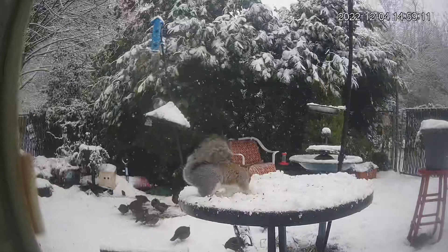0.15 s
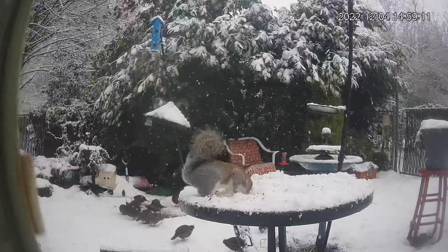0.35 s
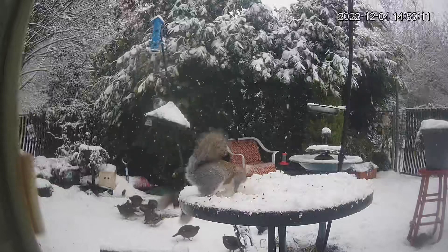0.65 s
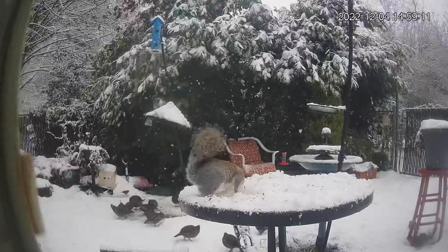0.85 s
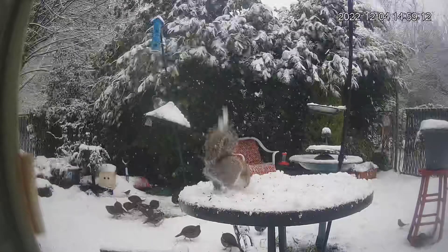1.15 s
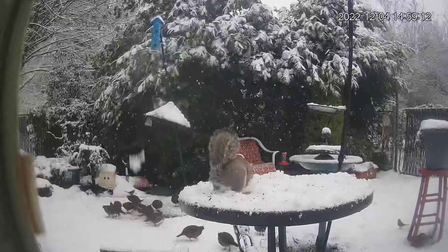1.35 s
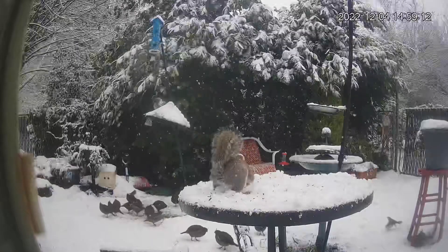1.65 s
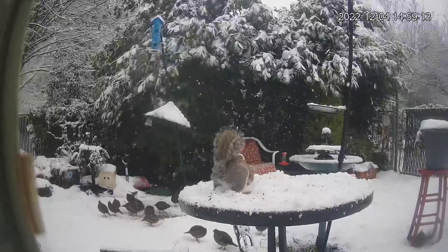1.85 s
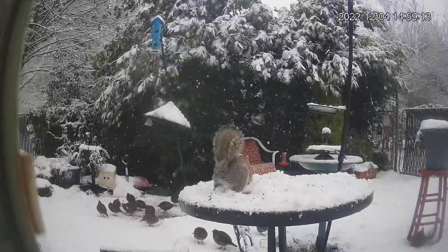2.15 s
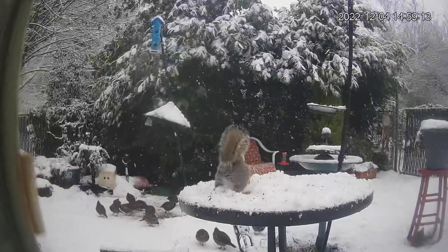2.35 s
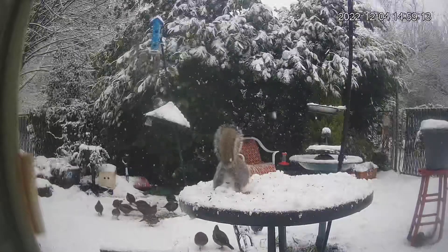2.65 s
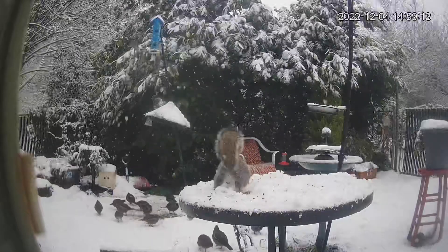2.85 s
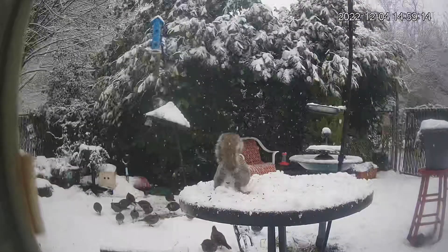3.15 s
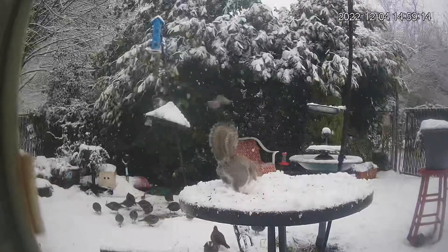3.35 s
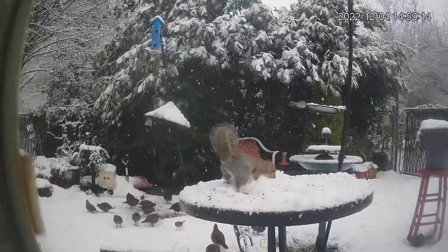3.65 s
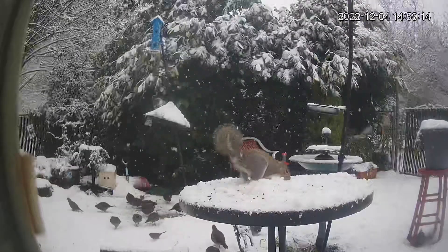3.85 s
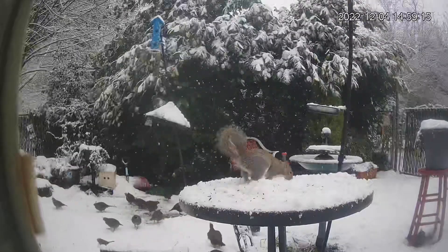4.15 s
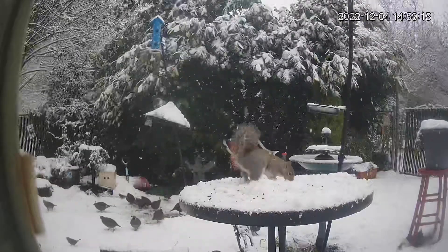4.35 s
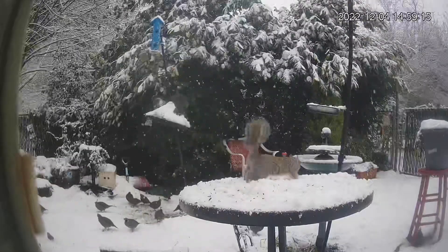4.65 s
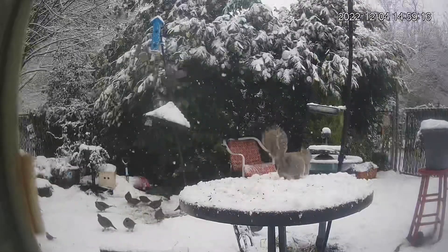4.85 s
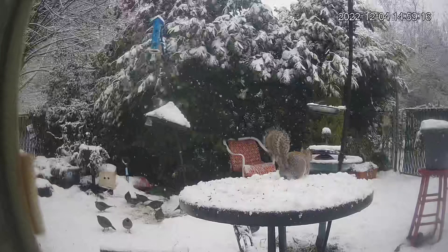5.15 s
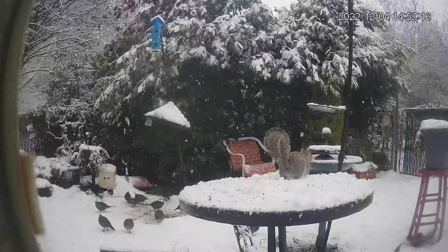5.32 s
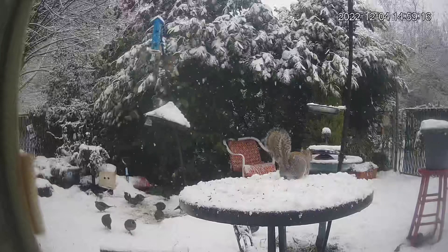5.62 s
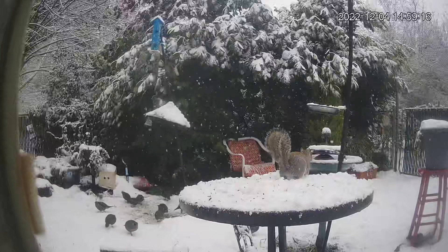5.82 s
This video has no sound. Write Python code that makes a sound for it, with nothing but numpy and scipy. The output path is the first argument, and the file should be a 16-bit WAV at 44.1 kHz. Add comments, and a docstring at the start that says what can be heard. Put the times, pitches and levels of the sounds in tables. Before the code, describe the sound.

Quail chips and buzzy twitters fill a snowy yard while an engine hums away, a sparrow whistles a falling song and wings flutter past.

```python
"""Quail chatter in a snowy backyard: short arched chips, some buzzing, a run of louder twitters, two slow churrs.
Two-voiced seeps of small birds and falling tails of chips slide by, beaks tick, a sparrow whistles a falling song.
An engine pulls away with a hum over exhaust rumble; a bird flutters past in tonal thuds and feather hiss;
a squirrel crunches and knocks on a table in bursts of noise. Behind lie faint air and short bursts of low rumble.
Scattered echoes place the birds in the yard; the outdoor camera suppresses faint noise and cuts the top."""
import sys
import numpy as np
from scipy import signal
from scipy.fft import rfft, irfft
from scipy.io import wavfile
from scipy.ndimage import uniform_filter1d

SR = 44100
rng = np.random.default_rng(int(sys.argv[2]) if len(sys.argv) > 2 else 0)


def master(y):
    """Save y as 16-bit WAV."""
    cut = np.clip(np.atleast_2d(y).T, -1, 1)
    pcm = np.round(cut * 32767)  # scale
    wavfile.write(sys.argv[1], SR, pcm.astype(np.int16))


N = 263718
T = np.arange(N) / SR

# spectral outline of crunching snow, also lent to the wing swish: (f/Hz, rel. level/dB)
SNOW_CRUNCH = [(400, -12), (900, -6.5), (1500, -1.5), (2500, -7.5), (4000, -6.5), (7000, -24.5)]


def undb(db):
    """Decibels to gain."""
    return 10 ** (np.asarray(db) / 20)


def unit(x):
    """Scale to rms 1."""
    return x / np.sqrt(np.mean(x ** 2))


def response(hz, points):
    """Gain of a (Hz, dB) outline at these frequencies, straight on a log-frequency axis."""
    f, db = np.transpose(points)
    return undb(np.interp(np.log(np.maximum(hz, 1)), np.log(f), db))


def colour(x, points):
    """Filter by a (Hz, dB) outline without shifting phase."""
    return irfft(rfft(x) * response(np.fft.rfftfreq(len(x), 1 / SR), points), len(x))


def wander(rate_hz, size=N):
    """Random drift around zero: straight lines between chance values drawn at this rate."""
    steps = np.arange(size) * rate_hz / SR
    return 1.56 * np.interp(steps, np.arange(size), rng.standard_normal(size))


def turn(hz):
    """Running phase of a moving pitch."""
    return 2 * np.pi * np.cumsum(hz) / SR


def add(out, start, x):
    """Mix a sound in at a time in seconds."""
    i = int(round(start * SR))
    a, b = max(i, 0), min(i + len(x), N)
    out[a:b] += x[a - i:b - i]


def echo(x, delay_s, db):
    """Add one distinct reflection."""
    return x + undb(db) * np.interp(T - delay_s, T, x, left=0)


def yard(x, wet_db, t60, early):
    """Scattered echoes: early ones from furniture and ground, a weak tail from the hedge."""
    t = np.arange(SR // 2) / SR
    # about 1500 echoes a second, each of random strength
    scatter = rng.standard_normal(len(t)) * (rng.random(len(t)) < 1500 / SR)
    decay = undb(-60 * t / t60) + early * np.exp(-t / 0.017)
    tail = scatter * (t > .002) * decay
    return x + undb(wet_db) * signal.fftconvolve(x, tail / np.linalg.norm(tail))[:N]


def air():
    """Faint outdoor rush of noise, over low rumble let through in short bursts by the camera's noise gate."""
    # still air: (f/Hz, rel. level/dB)
    still_air = [(20, -21), (50, -12), (115, -3), (230, -12.5), (330, -13), (550, -13), (800, -19),
                 (2000, -18), (4000, -22), (7000, -21.5)]
    # low rumble: (f/Hz, rel. level/dB)
    low_rumble = [(20, -32), (50, -12), (75, 1), (115, 2), (230, -9), (400, -19), (800, -36), (2000, -60)]
    # level of the let-through rumble before its random drift: (t/s, level/dB)
    gated_level = [(0, -84), (.035, -63), (.125, -60), (.166, -84), (.222, -65), (.31, -82), (.55, -84),
                   (.59, -63), (.93, -64), (.975, -84), (5.19, -86), (5.23, -63), (5.275, -57), (5.45, -71),
                   (5.85, -74), (5.93, -62), (5.98, -62)]
    rush_db = -65 + 1.8 * wander(14)
    rumble_db = np.interp(T, *np.transpose(gated_level)) + 1.8 * wander(25)
    rush = unit(colour(rng.standard_normal(N), still_air)) * undb(rush_db)
    rumble = unit(colour(rng.standard_normal(N), low_rumble)) * undb(rumble_db)
    return rush + rumble


def engine():
    """Eight uneven cylinders puff into the exhaust; the firing rate stands out as a hum."""
    # engine speed, climbing and then shifting up: (t/s, firing rate f/Hz)
    revs = [(1.05, 83.7), (1.25, 97.5), (1.75, 114), (2.35, 125.3), (3.2, 128.3), (3.45, 124), (3.8, 107.5),
            (4.2, 110.4), (5.1, 111)]
    # loudness before the surge: (t/s, hum level/dB, exhaust level/dB)
    loudness = [(1.0, -62, -64), (1.2, -36, -46.5), (1.45, -37, -47.5), (1.68, -36, -40),
                (2.15, -35.5, -39.5), (2.55, -36.5, -36), (2.88, -46, -41.5), (3.07, -31, -38.5),
                (3.4, -33, -40), (3.68, -44, -49), (3.8, -39, -44), (4.2, -35.5, -38.5), (4.5, -40, -43),
                (4.62, -55, -52), (4.75, -54, -49), (4.9, -70, -59), (5.06, -48, -52), (5.2, -82, -80)]
    # exhaust heard from afar: (f/Hz, rel. level/dB)
    exhaust = [(20, -16.5), (40, -20), (62, -14), (85, -2), (120, 4), (165, 0), (230, -4.5), (290, -11),
               (380, -20.5), (600, -36), (1000, -41), (2000, -47)]
    # lines from the uneven firing: (multiple of the firing rate, rel. level/dB)
    uneven_lines = [(.5, -11), (.75, -8), (1.25, -9), (1.5, -6.5), (1.75, -7.5), (2, -14)]
    # pipe resonances that the lines move through: (f/Hz, gain/dB)
    pipe = [(45, -7), (63, 2), (76, -11), (95, 0), (125, -5), (163, 3), (190, -14), (226, -1), (255, -8)]
    # strength of the eight puffs in turn: rel. level/dB
    cylinders = [0, 1.5, 5.5, -1.5, -1, -3.5, 4, -3]
    s, *columns = np.transpose(loudness)
    hum_db, exhaust_db = (np.interp(T, s, c) for c in columns)
    rate = np.interp(T, *np.transpose(revs))
    phase = turn(rate)

    firings = np.flatnonzero(np.diff(phase // (2 * np.pi)))
    puffs = np.zeros(N)
    puffs[firings] = undb(np.resize(cylinders, len(firings)))
    puffs[firings] -= puffs[firings].mean()  # only their unevenness rumbles
    gas = rng.standard_normal(N) * (1 + 0.39 * np.cos(phase))
    rumble = undb(-1) * unit(colour(unit(puffs) + 2.1 * unit(gas), exhaust))

    # the lines swell as they cross the pipe's resonances
    lines = np.zeros(N)
    for multiple, db in uneven_lines:
        strength = undb(db + 2 * wander(12)) * response(multiple * rate, pipe)
        lines += strength * np.sin(multiple * phase + .4 * wander(20))
    rumble += np.sqrt(2) * lines

    hum = np.sqrt(2) * np.sin(phase + .2 * wander(27)) * undb(1.3 * wander(26))
    gate = np.clip((T - s[0]) / 0.02, 0, 1) * np.clip((s[-1] - T) / 0.035, 0, 1)
    surge = undb(.7 * wander(14))  # the whole engine swells and sinks
    return gate * surge * (undb(hum_db) * hum + undb(exhaust_db) * rumble)


def squirrel():
    """Paws crunch the snow as shaped noise and knock the table's damped modes."""
    # paw scuffs: (t/s, rel. level/dB, decay/s)
    scuffs = [(1.27, -57, .02), (2.149, -59.5, .04), (2.325, -62, .03), (2.682, -44.5, .0087),
              (3.265, -66, .012), (3.41, -66, .012), (4.13, -64, .08), (4.315, -59, .035),
              (4.425, -59, .014), (4.585, -60, .035), (4.685, -60, .035), (4.83, -67, .025),
              (5.235, -64, .05), (5.59, -56, .0023)]
    # table modes: (f/Hz, width/Hz, rel. level/dB)
    table_modes = [(420, 47, 1), (530, 59, -1), (610, 53, -4.5)]
    knock_db = -3  # push on the table, against the crunch
    push, crunch = np.zeros(N), np.zeros(N)
    t = np.arange(SR // 4) / SR
    for s, db, decay in scuffs:
        press = np.exp(-t / decay) * (1 - np.exp(-t / (0.41 * decay)))
        add(push, s, press * undb(db + knock_db))
        add(crunch, s, press * undb(db))

    f = np.fft.rfftfreq(N, 1 / SR)
    modes = 0
    for k, (hz, width, db) in enumerate(table_modes):
        damping = 1j * f * width
        modes = modes + (-1) ** k * undb(db) * damping / (hz ** 2 - f ** 2 + damping)
    dull = 1 / (1 + (f / 800) ** 4)
    knocks = irfft(rfft(push * rng.standard_normal(N)) * modes * dull, N)
    grit = unit(colour(rng.standard_normal(N) * undb(1.6 * wander(500)), SNOW_CRUNCH))
    return undb(28) * knocks + 2.4 * crunch * grit


def wings():
    """A bird flutters past: a tonal thud and a swish for each wingbeat, then air through the feathers."""
    # wingbeats: (t/s of the peak, nominal f/Hz, rel. level/dB, length/s)
    wingbeats = [(4.347, 445, -38.5, .018), (4.392, 560, -39, .01), (4.415, 535, -48, .014),
                 (4.44, 430, -39, .009), (4.491, 579, -32, .0055), (4.54, 505, -35, .005),
                 (4.6, 530, -48, .012), (4.655, 433, -48, .014), (4.702, 420, -42, .014),
                 (4.744, 400, -48, .01)]
    # air through wing feathers: (f/Hz, rel. level/dB)
    feathers = [(600, -25), (1500, -9.5), (2600, -25), (3450, 7), (3750, -4), (4200, 7), (4900, 13.5),
                (5600, -7), (6300, -31)]
    thuds, swish = np.zeros(N), np.zeros(N)
    t = np.arange(-SR // 10, SR // 10) / SR
    for s, hz, db, length in wingbeats:
        stroke = undb(db) * np.exp(-(t / length) ** 2)
        rough_hz = hz * (1 + .07 * wander(200, size=len(t)))
        add(thuds, s - 1 / 10, stroke * np.sin(turn(rough_hz)))
        add(swish, s - 1 / 10, stroke)
    swish = undb(-28) * swish * unit(colour(rng.standard_normal(N), SNOW_CRUNCH))
    # the feather hiss swells once, pulsing 22 times a second
    swell = np.exp(-((T - 4.665) / 0.079) ** 2) * (1 + .5 * np.cos(2 * np.pi * 22 * T))
    hiss = undb(-52.5) * swell * unit(colour(rng.standard_normal(N), feathers))
    return yard(thuds + swish, wet_db=-7, t60=.22, early=2.5) + hiss


def pecks():
    """Faint decaying ticks of beaks on seed at random times, each with its own pitch and strength."""
    pecks_per_s, middle_db, spread_db, middle_hz, decay_s = 12, -65, 5, 2600, .005
    out, t = np.zeros(N), np.arange(SR // 20) / SR
    for when, pitch, size in rng.random((int(pecks_per_s * N / SR), 3)):
        hz = middle_hz * 2 ** (1.4 * (pitch - .5))
        ring = np.sin(2 * np.pi * hz * t) * np.exp(-t / decay_s)
        add(out, when * N / SR, undb(middle_db + spread_db * (2 * size - 1)) * ring)
    return out


def seeps_and_tails():
    """Thin two-voiced calls that slide quickly and level off: seeps of small birds and falling tails of quail chips."""
    # seeps and chip tails: (t/s, length/s, start f/Hz, target f/Hz, rel. level/dB, second voice against first/dB)
    slides = [(.025, .06, 1600, 2850, -48, -14), (.273, .057, 4950, 4780, -51, -18),
              (.314, .026, 2230, 2487, -52, -18), (.366, .048, 6840, 6350, -49, -18),
              (.762, .025, 3100, 2680, -32, -18), (.872, .04, 3150, 2780, -29, -12),
              (1.03, .03, 3200, 2770, -33, -15), (1.996, .14, 4280, 4080, -57, -30),
              (2.165, .072, 6130, 5248, -28, -7), (2.323, .085, 6400, 5723, -28.5, -18),
              (2.495, .05, 3700, 2880, -35, -12), (2.667, .079, 6900, 5910, -26, -14),
              (2.716, .043, 6100, 5020, -28, -9), (2.803, .08, 6300, 5620, -28.5, -3),
              (5.915, .05, 5890, 5616, -38, -22), (5.948, .06, 5400, 6200, -51, -18)]
    out, t = np.zeros(N), np.arange(SR // 8) / SR
    for s, length, start_hz, end_hz, db, second_db in slides:
        u = np.minimum(t / length, 1)
        slide_hz = end_hz + (start_hz - end_hz) * np.exp(-u / 0.25)
        hz = slide_hz * (1 + 0.0023 * wander(700, size=len(t)))
        # the second voice lies 670 Hz above the first
        voices = np.sin(turn(hz)) + undb(second_db) * np.sin(turn(hz + 670))
        add(out, s, 0.65 * undb(db) * np.sin(np.pi * u ** 0.79) ** 2 * voices)
    return out


def sag(end_s):
    """Loss of pitch in Hz as a note runs out."""
    return 210 * np.exp(np.minimum(T - end_s, 0) / .045)


def note(shape, hz, flicker_db, rough=.0025):
    """A pure tone with attack, hold and release, trembling in pitch and flickering in level."""
    start, end, db, attack, release = shape
    gate = np.clip((T - start) / .01, 0, 1) * np.clip((end - T) / .01, 0, 1)
    fade = np.clip(1 - (T - start) / attack, 0, 1) ** 2 + np.clip(1 - (end - T) / release, 0, 1) ** 2
    level = undb(db - 28 * fade + flicker_db * wander(50))  # attack and release reach 28 dB down
    tremble = 1 + rough * wander(130) + .003 * wander(22)  # fast roughness and slower waver
    return np.sqrt(2) * gate * level * np.sin(turn(hz * tremble))


def sparrow():
    """A held note slides down to a louder one; a faint lower note follows, blurred by echoes."""
    # each note: (start t/s, end t/s, rel. level/dB, attack/s, release/s)
    held_note = (3.54, 4.09, -48, .28, .03)
    low_note = (4.065, 4.41, -15, .06, .07)
    last_note = (4.52, 5.12, -51, .16, .2)
    # the last note wavers: (t/s, nominal f/Hz)
    last_pitch = [(4.61, 3880), (4.72, 3970), (4.9, 3955), (4.98, 3910), (5.03, 3990), (5.14, 3940)]
    # echoes strengthen and weaken the song on its way: (t/s, gain/dB)
    path_gain = [(3.6, -2), (3.76, 1), (3.93, -3), (3.97, 6), (4.05, 7), (4.088, -1), (4.102, -1),
                 (4.126, 4), (4.156, -1), (4.168, 5), (4.18, -2), (4.25, 3.5), (4.272, -6), (4.284, 4),
                 (4.324, -4), (4.35, 1), (4.382, -7)]
    held_hz, low_hz = 6010, 4315  # before sag and tremble
    slide_s, slide_decay_s = 4.074, .034  # when the pitch drops, and how fast it settles
    high = np.exp(-np.maximum(T - slide_s, 0) / slide_decay_s)
    hz = high * (held_hz - sag(slide_s)) + (1 - high) * (low_hz - sag(low_note[1]))
    last_hz = np.interp(T, *np.transpose(last_pitch))
    path = undb(np.interp(T, *np.transpose(path_gain)))

    faint = path * note(held_note, hz, flicker_db=2.5)
    faint += note(last_note, last_hz, flicker_db=2.5, rough=.007)
    loud = path * note(low_note, hz, flicker_db=.7)
    loud = echo(loud, delay_s=.062, db=-24)  # the hedge returns the song
    return yard(faint, wet_db=-4, t60=.3, early=1.1) + yard(loud, wet_db=-17.5, t60=.75, early=2.5)


def coos():
    """Soft low notes from the covey, arched in pitch and strength."""
    # coos: (t/s of the middle, length/s, nominal f/Hz, level/dB)
    low_coos = [(0.211, 0.11, 608, -47.5), (0.629, 0.1, 633, -62.5), (0.898, .1, 591, -48.5),
                (1.382, 0.039, 397, -45), (2.176, .08, 564, -44), (2.438, 0.077, 541, -53.5),
                (1.653, 0.079, 540, -56.5), (2.512, 0.062, 421, -50), (5.933, 0.096, 535, -59.5)]
    out = np.zeros(N)
    for s, length, hz, db in low_coos:
        u = np.clip((T - s) / length, -.5, .5)
        pitch = hz * (1.01 - 0.29 * u ** 2 + 0.016 * wander(180))
        out += undb(db) * np.cos(np.pi * u) ** 2 * np.sin(turn(pitch))
    return out


def chip(rise, fall, top_hz, first_db, octave_db, buzz, buzz_hz, rest_hz, arch, square, hold, skirt_db,
         cut_hz, lift_db, fade_db, lead, third_db, buzz_at, buzz_width, upper, lower, second, wobble,
         rasp, crack, hiss_db):
    """One arch of pitch: the octave climbs hoarsely through the beak, the fundamental bursts out at the top."""
    # resonance of throat and beak: (f/Hz, gain/dB)
    beak = [(3300, -7), (3700, -6), (4150, 0), (4700, 1.5), (5300, -5), (5900, -11), (6800, -18)]
    # turbulent air in the throat: (f/Hz, rel. level/dB)
    throat_air = [(2300, -35), (3000, -6), (3600, -2), (4600, 0), (5600, -2), (6300, -13), (7000, -24)]
    t = np.arange(-SR // 10, SR // 10) / SR
    size = len(t)
    u = np.where(t < 0, t / rise, t / fall)  # -1 to 1 across the call, 0 at the top
    height = np.exp(-np.abs(u / arch) ** square)
    hz = rest_hz + (top_hz - rest_hz) * height

    # the two sides of the syrinx beat: they shake the pitch and throw side tones
    beat = turn(buzz_hz * (1 + 0.11 * wander(270, size)))
    depth = buzz * np.exp(-((u - buzz_at) / buzz_width) ** 2)
    phase = turn(hz * (1 + 0.014 * wander(700, size))) + wobble * depth * np.sin(beat)
    side_tones = upper * np.exp(1j * beat) + lower * np.exp(-1j * beat) + second * np.exp(2j * beat)
    sides = 1 + depth * side_tones

    burst = np.exp(-np.abs(u / hold) ** 3.6)
    burst += undb(skirt_db) * np.exp(-((u - .2) / (2.6 * hold)) ** 2)
    first = undb(first_db) * burst / (1 + (cut_hz / hz) ** 12) * np.exp(1j * phase)
    # the fundamental is unsteady in strength and phase
    first = first * undb(6 * crack * wander(240, size)) * np.exp(1.5j * crack * wander(380, size))

    # the octave rasps throughout, and weakens on the way down
    scrape = rasp * np.interp(u, [-.3, .3], [1.1, .9]) * wander(650, size)
    effort_db = octave_db + lift_db * height - fade_db * np.clip(u, 0, 1) + 2.5 * rasp * wander(450, size)
    octave = undb(effort_db) * response(2 * hz, beak) * np.exp(1j * (2 * phase + scrape))
    # the third harmonic shows only in the low start of the call
    start = (1 - height) ** 2 * (t < 0)
    third = undb(octave_db + third_db) * response(3 * hz, beak) * start
    third = third * np.exp(1j * (3 * phase + scrape))

    flutter = undb(1.1 * rasp * wander(280, size))
    swell = 1 / (1 + np.abs(u / np.where(t < 0, lead, .91)) ** np.where(t < 0, 5.5, 10.5))
    tones = swell * np.imag((first + octave + third) * sides)
    # breath hisses on the way up and pulses with the beat
    hiss = unit(colour(rng.standard_normal(size), throat_air)) * (1 + .6 * np.cos(beat))
    hiss *= np.exp(-((u + .65) / .42) ** 2)
    return flutter * (tones + undb(octave_db + hiss_db) * hiss)


def calls(rows, voice, buzz_hz):
    """Play arched calls of one kind, each a little off in pitch (1.2 %) and buzz rate (7 %)."""
    out = np.zeros(N)
    quirks = 1 + rng.standard_normal((len(rows), 2)) * [.012, .07]
    for (s, rise, fall, top_hz, first_db, octave_db, buzz), (pitch, rate) in zip(rows, quirks):
        call = chip(rise, fall, top_hz * pitch, first_db, octave_db, buzz, buzz_hz * rate, **voice)
        add(out, s - 1 / 10, call)
    return out


def quail():
    """Arched syrinx calls: chips and churrs from the covey further off, twitters from close by, and coos."""
    # chips, listed by the top of the arch:
    # (t/s, rise/s, fall/s, nominal top f/Hz, fundamental rel. level/dB, octave rel. level/dB, buzz depth)
    chips = [ (.003, .03, .04, 3420, -32, -54, 1.5), (.091, .05, .05, 3340, -25.5, -60, .1),
             (.195, .045, .05, 3400, -35, -59, 1.0), (.353, .04, .04, 3420, -29.5, -50, 1.1),
             (.476, .035, .03, 3380, -31, -44, 1.5), (.564, .07, .06, 3290, -33.5, -54, .05),
             (.633, .04, .045, 3380, -29, -46, .9), (.718, .056, .042, 3360, -22, -30, .05),
             (.756, .035, .03, 3450, -26, -46, 1.8), (.78, .025, .04, 3250, -33, -52, 1.5),
             (.868, .042, .036, 3370, -17, -29.5, .7), (1.022, .04, .05, 3400, -23, -48, .7),
             (1.038, .035, .04, 3400, -27, -48, .9), (1.088, .05, .045, 3380, -28.5, -32, .1),
             (1.244, .05, .04, 3450, -20, -32, .7), (1.408, .043, .036, 3380, -26, -33, .05),
             (1.493, .04, .045, 3430, -26, -42, .7), (1.511, .035, .04, 3330, -28.5, -50, .8),
             (1.61, .05, .04, 3450, -21.5, -33, .1), (1.805, .038, .036, 3340, -20.5, -35, .1),
             (2.506, .04, .04, 3400, -32, -42, .2)]
    # lower twitters, led by the octave:
    # (t/s of the top, rise/s, fall/s, nominal top f/Hz, octave rel. level/dB, buzz depth)
    twitter_rows = [ (.129, .036, .032, 2130, -29, .8), (2.311, .024, .018, 2070, -40, .5),
                    (2.489, .024, .026, 2100, -21.5, .6), (2.679, .032, .034, 2750, -23, .5),
                    (2.796, .031, .032, 2350, -17.5, .9), (2.935, .038, .021, 2440, -17.5, .55),
                    (3.058, .032, .03, 2780, -14.5, .35), (3.201, .032, .027, 3230, -14.5, .45)]
    # slow, hoarse churrs: (t/s of the top, rise/s, fall/s, fundamental rel. level/dB)
    churr_rows = [(4.873, .055, .04, -44), (5.252, .075, .055, -38)]
    # the beak lets little of a low fundamental out: (top f/Hz, fundamental against octave/dB)
    twitter_fundamental = [(2150, -40), (2350, -26), (3200, -22)]
    # ground reflection and camera housing colour the covey, with a deep notch: (f/Hz, gain/dB)
    ground = [(1500, 0), (1850, 3), (2100, -2), (2300, 0), (2560, -6), (2860, 3), (3080, -2), (3400, 1),
              (3530, -1), (3680, -14), (3830, -4), (4050, 1.5), (4600, 1.5), (5900, -1), (6400, 3),
              (6650, 0), (6850, -9)]
    # voicing of each kind of call; widths and places on the arch are shares of rise and fall:
    # rest_hz pitch at both ends [Hz]; arch, square width and squareness of the arch; hold length of the burst;
    # skirt_db fundamental beside the burst [dB]; cut_hz pitch under which it dies [Hz];
    # lift_db, fade_db octave's lift at the top and fade on the way down [dB];
    # lead length of the lead-in; third_db its third harmonic [dB]; buzz_at, buzz_width place and width of the buzz;
    # upper, lower, second side-tone strengths; wobble pitch shake [rad];
    # rasp, crack hoarseness of octave and fundamental; hiss_db breath against octave [dB]
    chip_voice = dict(rest_hz=2050, arch=.53, square=2.2, hold=.205, skirt_db=-19, cut_hz=2750, lift_db=3.5, fade_db=21, lead=.84, third_db=-40, buzz_at=0.02, buzz_width=.5, upper=1.0, lower=.1, second=.25, wobble=.05, rasp=.85, crack=.22, hiss_db=-24)
    twitter_voice = dict(rest_hz=1700, arch=.65, square=2.5, hold=1.15, skirt_db=-18, cut_hz=1600, lift_db=-.3, fade_db=1, lead=.9, third_db=-14, buzz_at=-.15, buzz_width=.6, upper=.4, lower=.3, second=.03, wobble=.5, rasp=.5, crack=.7, hiss_db=-27)
    churr_voice = dict(chip_voice, hold=.33, arch=.7, wobble=.5)

    # churrs top out near 3150 Hz, octave 24 dB below the fundamental, buzz depth .55
    churrs = [(s, rise, fall, 3150, db, db - 24, .55) for s, rise, fall, db in churr_rows]
    twitters = []
    for s, rise, fall, hz, db, buzz in twitter_rows:
        first_db = db + np.interp(hz, *np.transpose(twitter_fundamental))
        twitters.append((s, rise, fall, hz, first_db, db, buzz))

    far = calls(chips, chip_voice, buzz_hz=670) + calls(churrs, churr_voice, buzz_hz=300)
    near = calls(twitters, twitter_voice, buzz_hz=350)
    far = echo(far, delay_s=.0135, db=-12)  # the house wall returns chips and churrs
    near = echo(near, delay_s=.006, db=-13)  # the table returns the twitters
    covey = yard(far, wet_db=-5.5, t60=.22, early=5) + yard(near, wet_db=-12.5, t60=.22, early=4.5)
    return colour(covey, ground) + coos()


def scene():
    """Birds in the yard over the engine, the squirrel and the air."""
    thin_calls = yard(seeps_and_tails() + pecks(), wet_db=-1.5, t60=0.15, early=1.5)
    song = undb(0.2) * yard(sparrow(), wet_db=-13, t60=0.26, early=0.94)
    return (air() + engine() + squirrel() + wings() + thin_calls + song + quail())[None]


def suppress(x, threshold_db, depth_db):
    """Noise suppressor: each band is turned down while it is quiet, the more readily just after it was loud."""
    memory_s, creep_db = .3, -25  # the noise estimate creeps up after loud sounds
    duck_db, duck_hz = -5, 3000  # extra depth just after loud sounds, full from this frequency up
    hz, _, bands = signal.stft(x, SR, nperseg=512, noverlap=384)
    power = uniform_filter1d(np.abs(bands) ** 2, size=3, axis=-2)  # smoothed across bands
    power = uniform_filter1d(power, size=5, axis=-1)  # then over time
    keep = np.exp(-128 / SR / memory_s)  # 128 samples a step
    recent = signal.lfilter([1 - keep], [1, -keep], power)
    noise = undb(threshold_db) ** 2 + undb(creep_db) ** 2 * recent
    opening = power ** 2 / (power ** 2 + noise ** 2)
    alert = (1 - undb(threshold_db) ** 2 / noise) * np.minimum(hz[:, None] / duck_hz, 1)
    gain = undb((depth_db + duck_db * alert) * (1 - opening))
    return signal.istft(bands * gain, SR, nperseg=512, noverlap=384)[1][:, :N]


def record(dry):
    """The camera suppresses faint noise and cuts steeply above 7150 Hz."""
    quiet = suppress(dry, threshold_db=-82.5, depth_db=-7.5)
    top_cut = signal.ellip(8, .1, 50, 7150, fs=SR, output="sos")
    return signal.sosfiltfilt(top_cut, quiet)


dry = scene()
out = record(dry)
master(out)
```